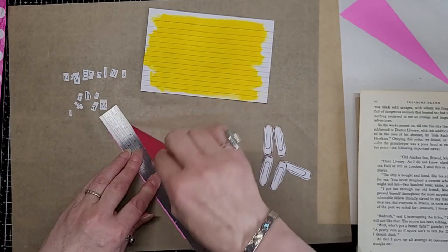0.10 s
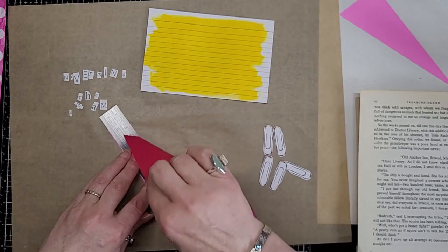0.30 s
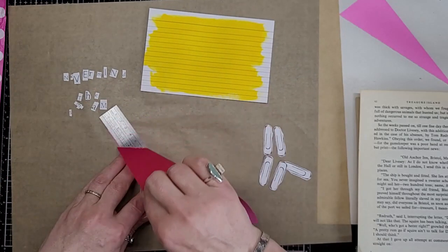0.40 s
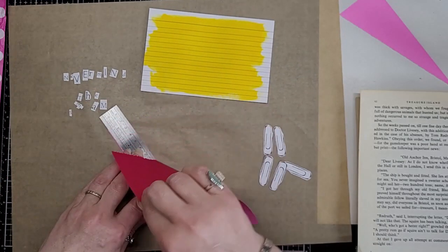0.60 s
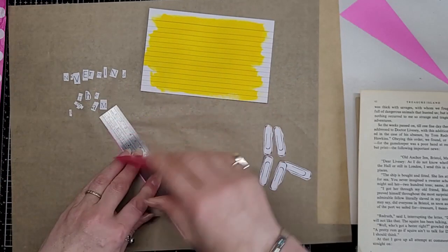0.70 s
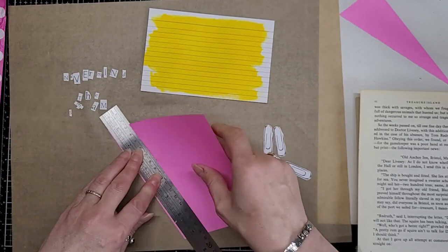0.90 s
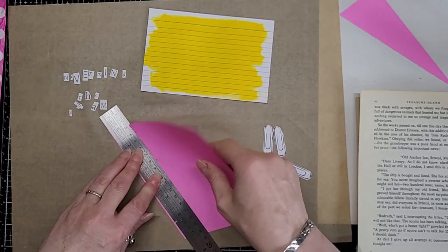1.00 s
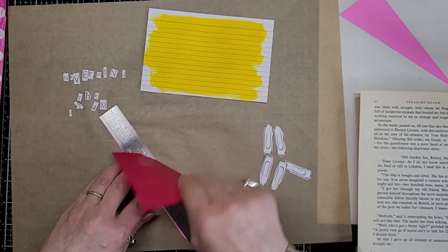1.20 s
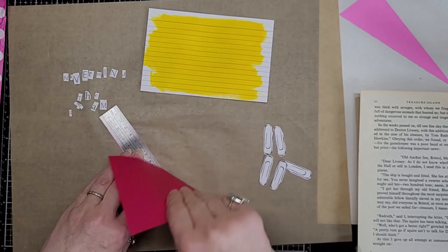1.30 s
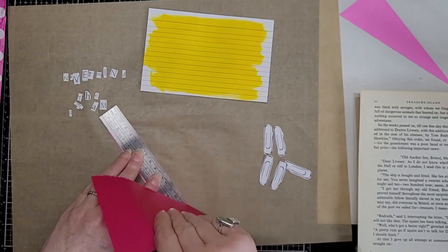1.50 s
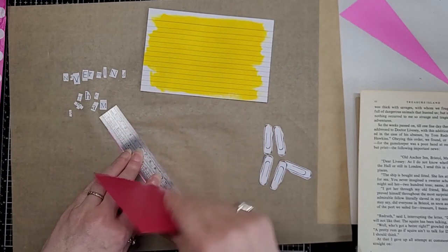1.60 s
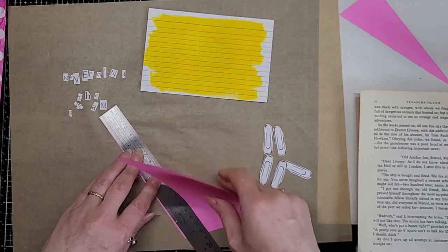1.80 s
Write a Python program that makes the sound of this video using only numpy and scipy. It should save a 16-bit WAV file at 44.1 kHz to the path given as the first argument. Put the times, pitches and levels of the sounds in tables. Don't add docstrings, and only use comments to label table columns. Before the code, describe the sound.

Paper tearing against a metal ruler: four quick rips, soft crumpling, then one longer rip

```python
import sys
import numpy as np
from scipy import signal
from scipy.fft import rfft, irfft
from scipy.io import wavfile

SR = 44100
rng = np.random.default_rng(int(sys.argv[2]) if len(sys.argv) > 2 else 0)


def generate_wav(signal):
    frames = np.transpose(np.atleast_2d(signal))
    scaled = np.clip(frames, -1, 1) * 32767
    pcm = np.round(scaled).astype(np.int16)
    wavfile.write(sys.argv[1], SR, pcm)


def makeup_ratio(level_db):
    decades = np.asarray(level_db, float) / 20
    return 10 ** decades


N = 81585


def rms_one(x):
    return x / np.sqrt(np.mean(x ** 2) + 1e-30)


def in_time(rows, silent_db=-130):
    t_s = np.arange(N) / SR
    knots_s, *columns = np.transpose(rows)
    out = [np.interp(t_s, knots_s, c) for c in columns]
    out[0] = np.interp(t_s, knots_s, columns[0], silent_db, silent_db)
    return out


def colour(x, points, rings=()):
    hz = np.maximum(np.arange(4097) * SR / 8192, 5)
    points_hz, points_db = np.transpose(points)
    gain = makeup_ratio(np.interp(np.log(hz), np.log(points_hz), points_db))
    gain = gain * (1 + sum(makeup_ratio(db) / (1 + (2 * (hz - f) / w) ** 2) for f, w, db in rings))
    cepstrum = irfft(np.log(rms_one(gain)))
    cepstrum[1:4096] *= 2
    cepstrum[4097:] = 0
    impulse = irfft(np.exp(rfft(cepstrum)))
    return signal.fftconvolve(x, impulse[(None,) * (x.ndim - 1)], axes=-1)[..., :N]


def drift(rate_hz):
    r = np.exp(-2 * np.pi * rate_hz / SR)
    noise = rng.standard_normal(N + SR)
    return rms_one(signal.lfilter([1], [1, -2 * r, r * r], noise)[SR:])


def clicks(per_s, spread_db, biggest_odds=0.03):
    chance, size, sign = rng.random((3, N))
    happens = chance < per_s / SR
    return rms_one(happens * makeup_ratio(-spread_db * np.log(size + biggest_odds)) * np.sign(sign - 0.5))


def tearing():
    # time in seconds, level in dB, brightness in dB, flap of the loose part in dB.
    short_rips = [
        [(0.13, -87, -5, -10), (0.15, -64.5, -3.5, -21), (0.164, -74.5, -4, -1), (0.182, -55, -3, -9),
         (0.19, -52.5, -1, -12.5), (0.212, -36.5, -4, -18), (0.228, -49, 1.5, -14), (0.246, -70, -9, -9),
         (0.255, -54, -6, 6)],
        [(0.255, -80, 12, 16), (0.267, -30.5, -7, -6), (0.279, -36, 0, -18.5), (0.317, -27.5, -2, -15),
         (0.361, -27.5, -4.5, -8.5), (0.405, -54.5, -1, -2)],
        [(0.405, -66, 11, -12), (0.411, -33.5, -4, -20), (0.419, -29.5, -2.5, -8.5), (0.457, -29.5, -2, -5.5),
         (0.515, -45.5, -4, -3)],
        [(0.515, -45, -6, -16), (0.532, -35, -5.5, -25), (0.537, -27.5, -5, -18), (0.56, -28.5, -4, -10),
         (0.613, -37, -2, -3), (0.633, -48.5, -5.5, -5.5), (0.645, -42, -3.5, -16), (0.69, -75, -14, 12)],
    ]
    # time in seconds, level in dB, brightness in dB, flap in dB.
    long_rip = [(1.332, -57, -10, -17), (1.335, -33.5, -10, -13), (1.355, -28.5, -7, -5.5),
                (1.407, -30.5, -3.5, -9), (1.459, -32.5, -2.5, -3), (1.485, -28, -2.5, -4.5),
                (1.527, -33, -4, -8), (1.595, -41, -3, -2.5), (1.675, -69.5, -8, 2.5)]
    # middle and length in seconds, frequency and width in Hz,
    # level in dB.
    panels = [(0.268, 0.038, 653, 90, -6), (0.28, 0.041, 1490, 120.4, -7), (0.324, 0.1, 7240, 200, -7),
              (0.335, 0.055, 4220, 400, -31), (.345, .04, 1070, 40, -13), (0.35, 0.029, 3110, 99.5, -7),
              (0.452, 0.11, 1430, 130, -4.5), (0.443, 0.099, 1986, 120, -3),
              (0.426, 0.068, 7050, 400, -4.5), (0.468, 0.045, 427, 150, -15), (0.554, 0.034, 3800, 80, -9),
              (0.562, 0.17, 598, 109, -11), (0.598, 0.073, 1260, 250, -1), (.615, 0.0087, 1360, 200, 1),
              (1.348, 0.062, 7980, 300, -9), (1.36, 0.034, 2020, 200, -6.5), (1.355, 0.041, 1400, 152, -16),
              (1.394, 0.056, 805, 100, -2.5), (1.48, 0.22, 2805, 113, -3.5), (1.5, 0.14, 5100, 200, -6),
              (1.49, .03, 742, 170, -12.5), (1.53, 0.14, 402, 150, -15), (1.544, 0.11, 7750, 247, -6.5)]
    shared, *own = [clicks(19000, spread_db=2.7) for _ in range(4)]
    level, pull = 0, 0
    for rip in short_rips + [long_rip]:
        db, bright_db, flap_db = in_time(rip)
        body_db = -4 - 0.72 * (bright_db + 3.5)
        pull = pull + makeup_ratio(db)
        level = level + makeup_ratio(db + np.array([flap_db - 3.5, body_db, bright_db + 2]))
    flap, body, treble = level * (0.95 * shared + 0.65 * np.array(own))
    return singing(pull * shared, panels) + paper(flap, body, treble)


def paper(flap, body, treble):
    # frequency in Hz, level in dB.
    flap_hz_db = [(40, -37), (120, -7.5), (300, -15), (480, -7.5), (700, -4.5), (1000, -2), (1500, -13.5),
                  (3000, -67)]
    sheet_hz_db = [(300, -28), (800, -3.5), (1300, -3.5), (2200, -2.5), (3200, -5), (4500, -3.5),
                   (7000, -16.5), (16000, -67.5)]
    fibre_hz_db = [(1000, -46), (2500, -21.5), (4000, 6.5), (7400, -0.5), (8800, -1), (12500, -1),
                   (15500, -2.5)]
    # frequency in Hz, width in Hz, level in dB.
    modes = [(680, 160, -4), (1080, 80, -6), (1450, 200, -1), (2150, 200, -3), (2850, 250, 0),
             (3900, 200, -5), (6000, 250, -4), (7500, 700, 1), (12300, 1200, -1)]
    low = colour(flap, flap_hz_db, modes)
    middle = colour(body, sheet_hz_db, modes)
    return low + middle + colour(treble, fibre_hz_db, modes)


def singing(shake, modes):
    out = np.zeros(N)
    for middle_s, length_s, hz, width_hz, db in modes:
        start = int((middle_s - length_s) * SR)
        size = int((2 * length_s + 0.03) * SR)
        phase = np.clip(np.arange(size) / SR / length_s - 1, -1, 1)
        drive = np.cos(np.pi / 2 * phase) ** 2 * shake[start:start + size]
        r = np.exp(-np.pi * width_hz / SR)
        poles = [1, -2 * r * np.cos(2 * np.pi * hz / SR), r * r]
        gain = makeup_ratio(db) * np.sqrt(1 - r * r) / 2
        out[start:start + size] += gain * signal.lfilter([1, 0, -1], poles, drive)
    return out


def bursts(rows, grains):
    t_s, level = np.arange(N) / SR, 0
    for start_s, rise_s, t60_s, db, flap_db, treble_db in rows:
        rise = np.clip((t_s - start_s) / max(rise_s, 1e-4), 0, 1)
        fall_db = -60 * np.maximum(t_s - start_s - rise_s, 0) / max(t60_s, 0.005)
        level = level + rise * makeup_ratio(db + fall_db) * makeup_ratio(np.array([[flap_db], [0], [treble_db]]))
    return paper(*(level * grains))


def snaps():
    # start in seconds, peak in dB, treble in dB, t60 in seconds.
    folds = [(0.15, -72, 7, 0.033), (0.167, -56, 11, 0.066), (0.18, -46, 13, 0.062),
             (0.195, -47.5, 12, 0.045), (0.209, -40, 4.5, 0.15), (0.26, -39, -8, 0.065),
             (0.2664, -31.5, -8, 0.08), (0.308, -35, -1, 0.08), (0.41, -29.5, -21, 0.17),
             (0.52, -33, -7, 0.052), (0.534, -30, -14, 0.24), (0.614, -49, -4, 0.018),
             (0.644, -38, -12, 0.046), (1.2913, -36, -9, 0.043), (1.2985, -45.5, -30, 0.3),
             (1.3184, -51, 8, 0.05), (1.3233, -31.5, 1, 0.094), (1.3359, -29, 5, 0.03),
             (1.35, -30, -0.5, 0.24)]
    thump = [26, 26, 6]
    level_db, flap_db = -9, -3
    grains = np.clip(clicks(11000, spread_db=2.5), -3, 3) * np.ones((3, 1))
    for start_s, *_ in folds:
        grains[:, int(start_s * SR) + 30] = thump
    rows = [(s, 1e-4, t60_s, db + level_db, flap_db, treble_db) for s, db, treble_db, t60_s in folds]
    return bursts(rows, grains)


def crumpling():
    # start in seconds, rise in seconds, t60 in seconds, level in dB, flap in dB.
    creasings = [(0, 0.00087, 0.16, -72.5, 0.5), (0.7, 0.0031, 0.17, -49.5, -2),
                 (0.755, 0.006, 0.065, -44.5, -5.5), (0.767, 0.02, 0.089, -47, -7),
                 (0.802, 0.0063, 0.072, -44.5, -11.5), (0.883, 0.0084, 0.14, -49.5, -5.5),
                 (0.931, 0.025, 0.52, -63, -11), (1.059, 0.0024, 0.56, -63, -10),
                 (1.113, 0.0025, 0.1, -41.5, -8), (1.139, 0.005, 0.23, -65.5, 4),
                 (1.203, 0.01, 0.12, -44.5, -0.5), (1.2417, 0.00079, 0.15, -46.5, -1),
                 (1.682, 0.023, 0.22, -59.5, -5)]
    treble_db, dull_hz = -21, 2960
    grains = clicks(9100, spread_db=-1.5)
    for start_s, rise_s, *_ in creasings:
        grains[int((start_s + min(rise_s, 0.002)) * SR)] = 3.4
    showers = bursts([(*row, treble_db) for row in creasings], grains)
    return signal.lfilter(*signal.butter(1, dull_hz, fs=SR), showers)


def sliding():
    # time in seconds, level in dB.
    strokes = [
        [(0.66, -75), (0.7, -79), (0.724, -54.5), (0.736, -67.5), (0.87, -59), (0.882, -52), (0.936, -68),
         (1.03, -78.5)],
        [(1.03, -89), (1.05, -83), (1.066, -64), (1.108, -65.5), (1.18, -88), (1.21, -55), (1.266, -87),
         (1.285, -59)],
        [(1.64, -58), (1.662, -95), (1.676, -71), (1.774, -67.5), (1.824, -75.5), (1.85, -61.5)],
    ]
    # frequency in Hz, level in dB.
    skin_hz_db = [(880, -37), (1500, -6.5), (1830, -3.5), (2410, -18.5), (3140, -4.5), (7330, -6.5),
                  (9850, -11.5), (11600, -6), (15800, -16.5)]
    level = sum(makeup_ratio(in_time(stroke)[0]) for stroke in strokes)
    patchy = makeup_ratio(1.8 * drift(67))
    return colour(level * patchy * clicks(17000, spread_db=4.5), skin_hz_db)


def space(x):
    # frequency in Hz, level difference in dB.
    lean_hz_db = [(100, 8), (300, 3), (640, -1), (1400, 3.5), (2500, 4.5), (4500, 1), (8000, -2),
                  (14000, 5)]
    places, place_s, apart_hz = 14, 0.0015, 500
    right_lag_s, lag_spread_s = 0.00012, 0.000045
    early_db, early_t60_s, room_db, room_t60_s = -1.5, 0.022, -13, 0.29
    t_s, out = np.arange(SR // 3) / SR, 0
    early = makeup_ratio(early_db) * rms_one(makeup_ratio(-60 * t_s / early_t60_s) * (t_s > 0.0012))
    tail = makeup_ratio(room_db) * rms_one(makeup_ratio(-60 * t_s / room_t60_s) * (t_s > 0.004))
    low, high = (signal.butter(1, apart_hz, kind, fs=SR) for kind in ("low", "high"))
    hops = rng.integers(0, places, int(N / SR / place_s) + 2)
    for k in range(places):
        same, *own = rng.standard_normal((3, len(t_s))) * (early + tail) / np.sqrt(len(t_s))
        ears = signal.lfilter(*low, same) + signal.lfilter(*high, own)
        lag_s = right_lag_s + lag_spread_s * rng.standard_normal()
        ears[:, :40] += np.sinc(np.arange(40) - 8 - SR * np.array([[0], [lag_s]]))
        share = np.interp(np.arange(N) / SR / place_s, np.arange(len(hops)), hops == k)
        out = out + signal.fftconvolve((x * share)[None], ears, axes=1)[:, 8:N + 8] * 0.71
    out = signal.sosfilt(signal.butter(2, 110, "high", fs=SR, output="sos"), out)
    return np.array([colour(out[k], [(hz, db * (0.5 - k)) for hz, db in lean_hz_db]) for k in range(2)])


def background():
    # time in seconds, level in dB.
    rumble_s_db = [(0.0, -65), (0.024, -71), (0.452, -62.5), (0.556, -68), (0.592, -60), (0.746, -73),
                   (0.782, -66), (1.174, -72), (1.216, -56), (1.334, -67.5), (1.484, -55), (1.85, -67.5)]
    # frequency in Hz, level in dB.
    rumble_hz_db = [(25, -22), (33, -20), (42, 1), (52, 0), (64, -5), (76, -15.5), (110, -15.5),
                    (150, -22.5), (200, -33.5)]
    air_hz_db = [(88, -46), (150, -11), (249, -9), (321, 0), (464, -21), (686, -13.5), (1210, -24.5),
                 (15800, -27)]
    air_db, pan_db, side_share = -80, -3.5, 0.16
    left_right = np.array([[1], [-1]])
    mid, side = colour(rng.standard_normal((2, N)), [(10, -55.0)] + rumble_hz_db + [(400, -94.5)])
    rumble = makeup_ratio(in_time(rumble_s_db)[0]) * rms_one(mid + side_share * side * left_right)
    hiss = makeup_ratio(air_db) * colour(rng.standard_normal((2, N)), [(60, -46.0)] + air_hz_db)
    return rumble * makeup_ratio(pan_db * left_right) + hiss


def scene():
    # middle and length in
    # seconds, frequency and width in Hz, level in dB.
    creases = [(0.761, 0.016, 1590, 300, -5.5), (0.758, 0.0068, 4600, 3000, 5.5),
               (0.794, 0.014, 3300, 500, 1.5), (0.807, 0.017, 662, 200, -3),
               (0.894, 0.014, 1620, 200, -4.5), (1.119, 0.019, 1430, 300, -6.5),
               (1.122, 0.014, 3250, 900, -3.5), (1.222, 0.017, 1480, 200, -4.5),
               (1.242, 0.0091, 1780, 400, -4), (1.256, 0.0096, 1400, 300, -0.5),
               (1.293, 0.0076, 1220, 600, -2), (1.72, 0.1, 830, 252, 1.5)]
    stiff_hz = 219
    small = signal.lfilter(*signal.butter(2, stiff_hz, "high", fs=SR), snaps() + crumpling())
    return space(tearing() + small + singing(small, creases) + sliding()) + background()


def band_limit(x):
    return signal.sosfilt(signal.butter(12, 16810, fs=SR, output="sos"), x)


def record(dry):
    top_cut = signal.cheby2(12, 60, 16600, fs=SR, output="sos")
    return band_limit(signal.sosfilt(top_cut, dry))


dry = scene()
out = record(dry)
generate_wav(out)
```